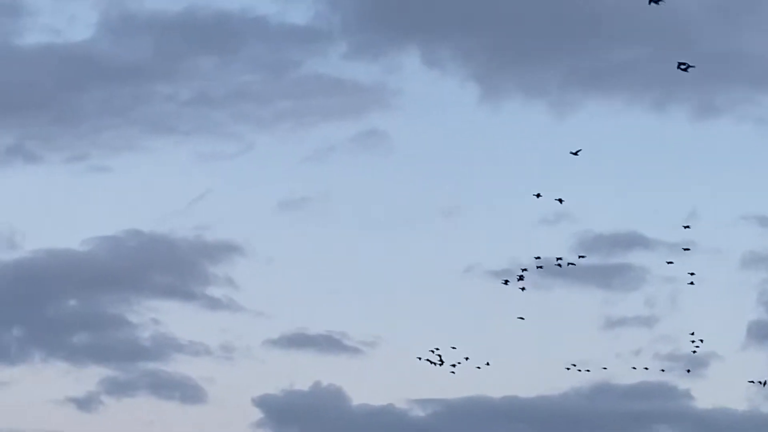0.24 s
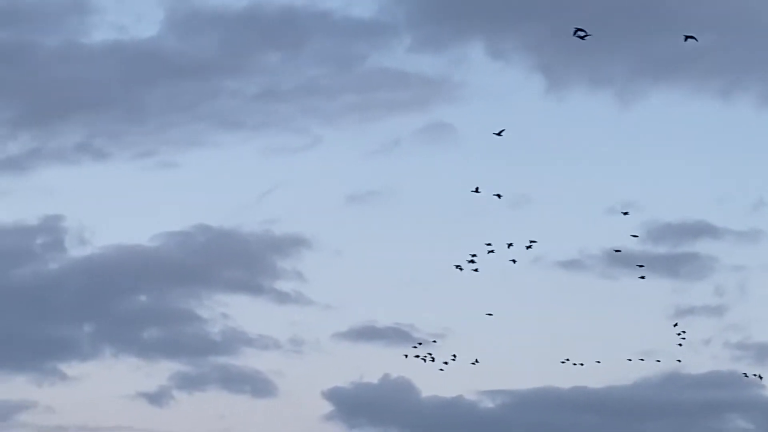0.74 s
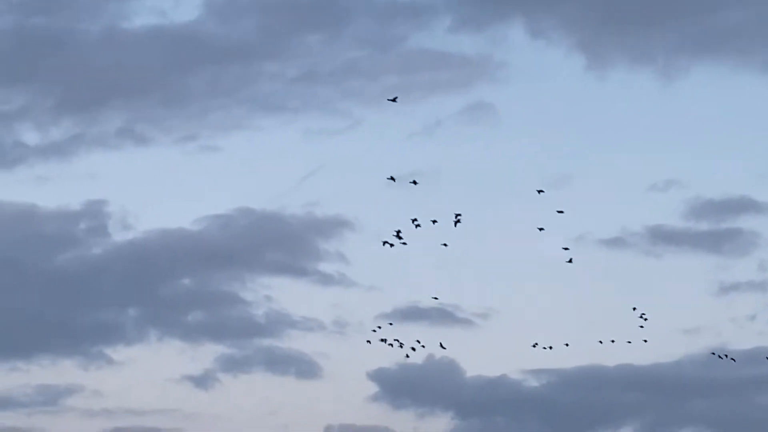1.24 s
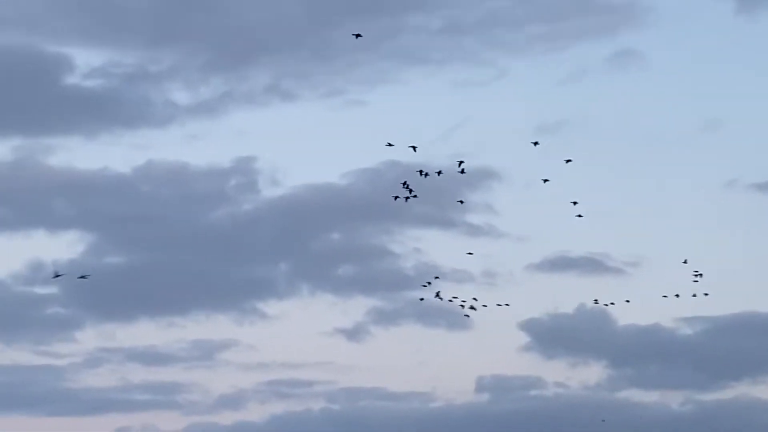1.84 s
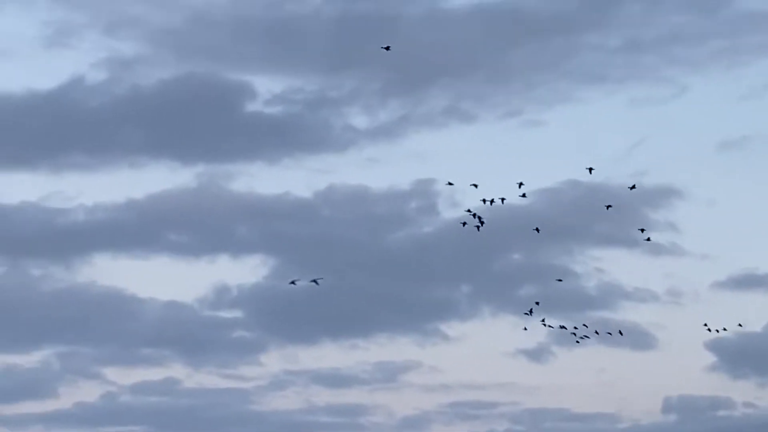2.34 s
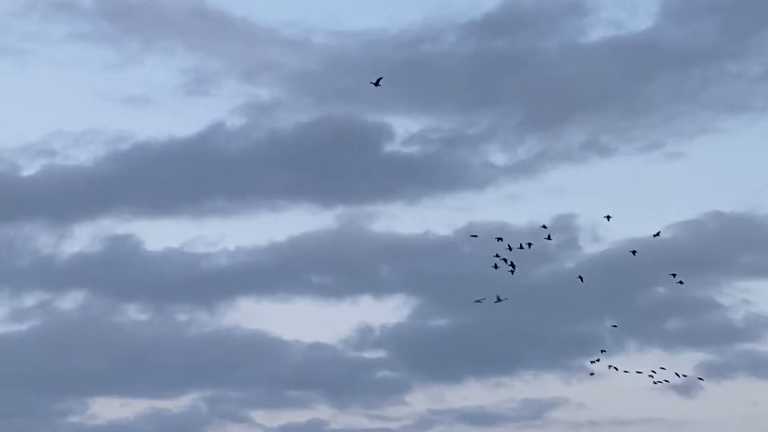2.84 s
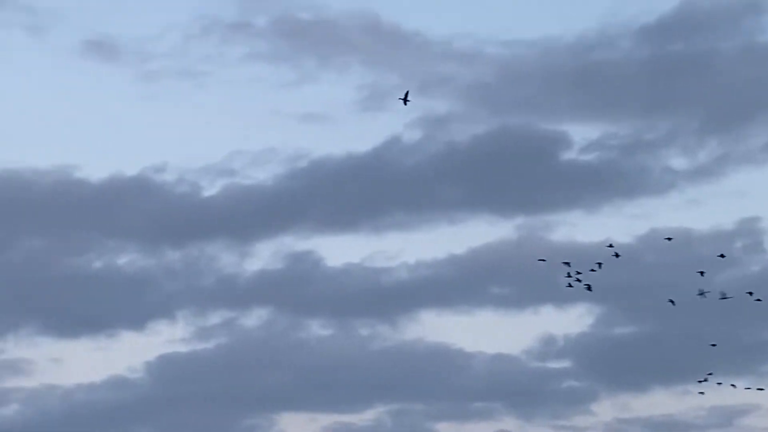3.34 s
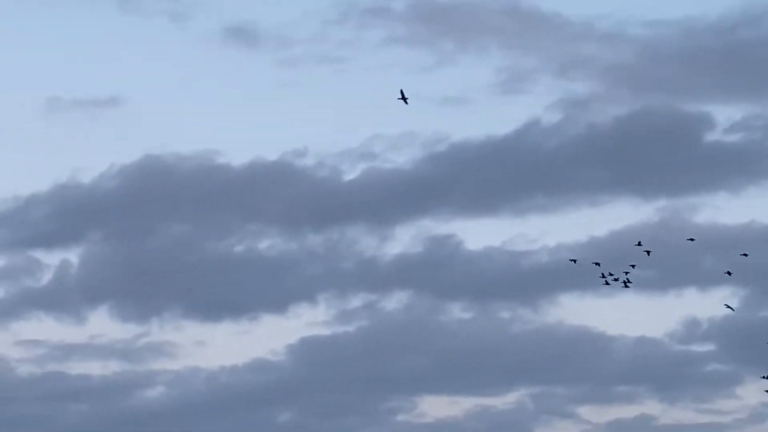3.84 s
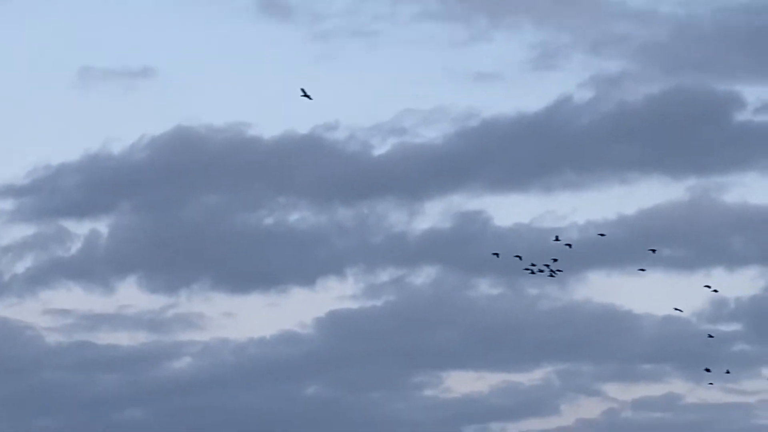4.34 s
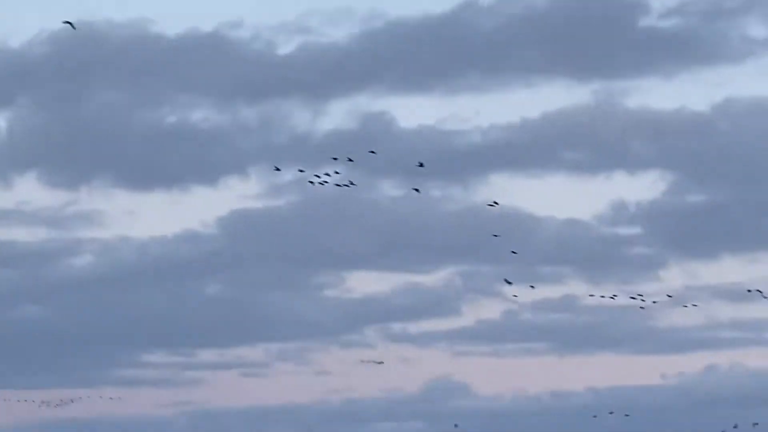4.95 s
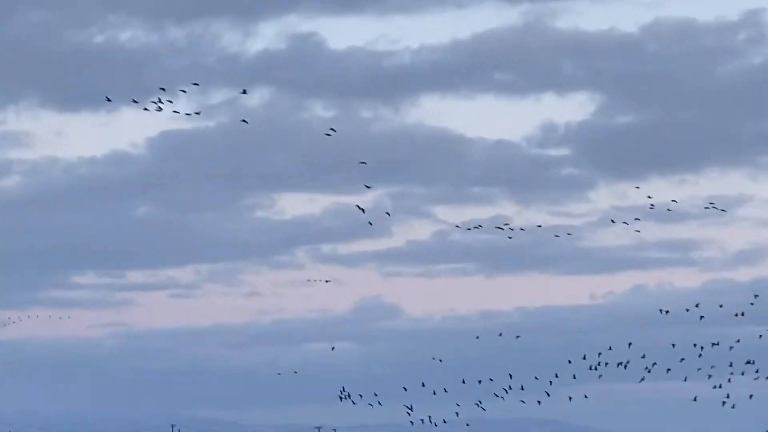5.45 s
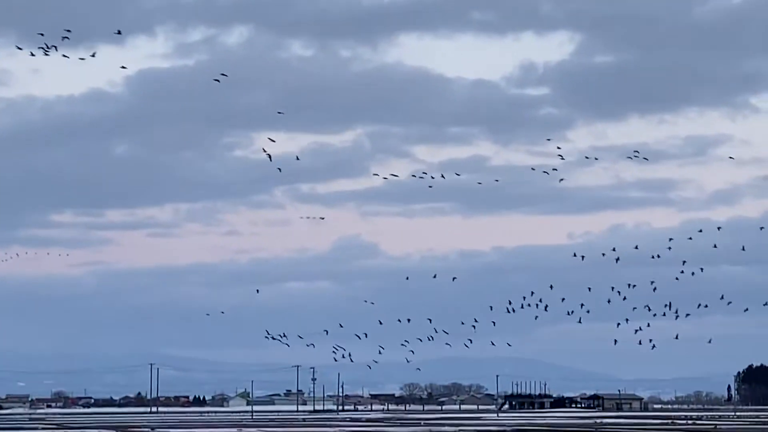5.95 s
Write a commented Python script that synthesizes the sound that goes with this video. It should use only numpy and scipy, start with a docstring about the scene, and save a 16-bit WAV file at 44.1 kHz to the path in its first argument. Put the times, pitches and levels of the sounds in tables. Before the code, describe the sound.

Outdoors on wide farmland, quick rounded goose yelps come densely, then more sparsely, then louder again. Behind them a skein chatters faintly and a far flock babbles, rising strongly at the end. Wind buffets the stereo microphone in soft bassy bumps, strongest near five seconds, as a passing car's broad rush swells. A few tiny handling ticks sit in the soft open-air background.

```python
"""Open fields: the nearest geese give short, high, arching yelps, their skein answers and a far flock babbles.
Each call is a bent tone with overtones; the open land adds a thin, dull tail.
Wind rumbles and thumps on the microphone, made of low noise; a soft murmur of shaped noise lies below.
Late on, a broad rush of noise, like the tyres of a passing car, swells and fades.
There are a few faint handling ticks, made of tiny dying bursts of noise."""
import sys
import numpy as np
from scipy import signal
from scipy.fft import rfft, irfft, next_fast_len
from scipy.io import wavfile
from scipy.ndimage import uniform_filter1d, map_coordinates

SR = 44100
rng = np.random.default_rng(int(sys.argv[2]) if len(sys.argv) > 2 else 0)


def unload_wav(signal):
    """Save mono or channel-first audio to the path in sys.argv[1] as 16-bit WAV at rate SR, clipped to [-1, 1]."""
    wavfile.write(
        sys.argv[1],
        SR,
        np.round(np.clip(np.atleast_2d(signal).T, -1, 1) * 32767).astype(np.int16),
    )


N = 273861

# calls of the nearest geese: (start [s], length [s], pitch near the crest [Hz],
# fundamental [dB], octave [dB], higher overtones [dB])
NEAR_CALLS = [(-0.038, 0.074, 1485, -48, -49.5, -51), (0.018, 0.072, 1483, -53.5, -57.5, -55.5),
              (0.081, 0.076, 1444, -47, -58, -63), (0.122, 0.059, 1475, -46, -53, -51.5),
              (0.203, 0.088, 1462, -47.5, -61, -67), (0.336, 0.045, 1434, -63, -64, -68),
              (0.41, 0.092, 1414, -63, -59.5, -68), (0.55, 0.061, 1404, -58, -69, -76),
              (0.608, 0.065, 1487, -52.5, -68, -68), (0.746, 0.044, 1436, -55, -65.0, -72),
              (0.819, 0.12, 1534, -48, -54, -59.5), (1.063, 0.088, 1700, -49, -80, -84),
              (1.087, 0.12, 1506, -47, -58, -61.5), (1.266, 0.05, 1598, -52, -63, -67.5),
              (1.299, 0.062, 1475, -50.5, -67, -67), (1.411, 0.08, 1474, -46, -67, -64.5),
              (1.535, 0.075, 1420, -53, -74, -75.5), (1.585, 0.11, 1650, -53, -77, -86),
              (1.712, 0.1, 1517, -55, -55, -64), (1.834, 0.085, 1445, -56, -60.5, -68),
              (2.145, 0.062, 1433, -54, -54, -66), (2.208, 0.059, 1021, -53.0, -72.0, -71),
              (2.365, 0.095, 1484, -55, -59, -70), (2.47, 0.082, 1500, -58, -55.5, -65.0),
              (2.758, 0.094, 1710, -50, -75, -80), (3.177, 0.054, 1490, -51.5, -61, -65),
              (3.276, 0.081, 1510, -51.5, -74, -69), (3.342, 0.095, 1348, -48, -57, -57.0),
              (3.374, 0.059, 1483, -46, -55.5, -59.5), (3.502, 0.079, 1330, -50.5, -64, -65),
              (4.103, 0.074, 1500, -50.5, -63, -69), (4.464, 0.062, 1448, -46, -59.5, -77),
              (4.589, 0.04, 1490, -40, -49, -46), (4.61, 0.054, 1680, -42, -51, -55),
              (4.641, 0.066, 1553, -53, -62, -56.5), (4.673, 0.053, 1326, -51, -52.5, -57),
              (4.798, 0.056, 1437, -43, -53, -49.5), (5.116, 0.039, 996, -44.5, -41, -55),
              (5.125, 0.08, 1275, -43, -47.5, -53), (5.275, 0.049, 1277, -42.5, -48, -53.5),
              (5.471, 0.085, 1488, -44.5, -56, -71), (5.759, 0.075, 1523, -45.5, -60.5, -59.0),
              (5.924, 0.048, 1582, -45, -67.5, -74.0), (6.165, 0.07, 1478, -47.5, -61, -74)]
# a goose's throat: its higher overtones are level up to the first frequency [Hz],
# weaken by the second and die away by the third
THROAT_HZ = [4890, 5650, 7400]
# the rest of the near skein: (time [s], level [dB])
SKEIN_LEVEL = [(0, -59.5), (1.5, -56.5), (3, -56.5), (4.5, -58), (5.7, -51.5), (6.2, -55)]
# voice of the skein: (pitch [Hz], pitch spread [natural log], octave [dB], higher overtones [dB]),
# overtones compared with the fundamental
SKEIN_VOICE = (1440, 0.07, -13, -23.5)
# the big far flock: (time [s], level [dB])
FLOCK_LEVEL = [(0, -62), (3, -61), (4.8, -59), (5.7, -47), (6.2, -49)]
# voice of the far flock, lower, more varied and dulled by the air: same columns as the skein's voice
FLOCK_VOICE = (1090, .19, -22, -33)
# wind rumble between the eddies, before the overall lift: (time [s], level [dB])
RUMBLE_LEVEL = [(0.0, -69), (0.6, -55), (1.28, -43), (3.08, -46.5), (3.53, -37), (3.79, -57), (4.01, -51.5),
                (4.17, -42.5), (5.14, -35.5), (5.62, -39), (6.1, -36.5)]
# colour of the wind rumble: (frequency [Hz], relative level [dB])
RUMBLE_COLOUR = [(20, -28.5), (40, -12.5), (62, 1), (84, 1), (140, -5.5), (250, -13), (400, -20),
                 (1200, -100.5)]
# eddies that hit the microphone: (middle [s], strength [dB], length [s])
EDDIES = [(1.095, -38.5, .17), (1.328, -31.5, 0.066), (1.405, -32.5, 0.026), (1.712, -26, .075),
          (2.058, -28.5, .1), (2.445, -34, .1), (2.699, -36, 0.17), (2.873, -37, 0.027),
          (3.263, -33.5, 0.061), (3.431, -30, 0.081), (3.511, -31.5, 0.033), (3.539, -24.5, 0.029),
          (3.588, -28.5, .045), (4.069, -35.5, 0.067), (4.623, -27, .05), (4.753, -29.5, .03),
          (4.833, -27, .04), (4.983, -19, 0.056), (5.142, -23, 0.063), (5.183, -21, 0.023),
          (5.819, -35, 0.08)]
# how the wind splits between the two microphone ports:
# (time [s], unshared part [dB], lift on the left and equal cut on the right [dB])
PORTS = [(3.9, -13.5, 0.1), (4.98, -0.5, 0.4), (5.3, -6.5, 0.7), (5.8, -1, 3)]
# swell and fade of the tyre roar:
# (peak time [s], peak level [dB], approach [s], retreat [s], loss per tenfold distance [dB])
ROAR_PASS = (5, -36, 1.5, 1.13, 75.5)
# swell and fade of the tread spray: same columns as the roar
HISS_PASS = (5.5, -48.5, 1.12, 0.36, 34.5)
# colour of the tyre roar: (frequency [Hz], relative level [dB])
ROAR_COLOUR = [(100, -17), (280, -0.5), (390, -2.5), (490, -3.5), (830, -3), (1230, -8.5), (1950, -13.5),
               (2800, -29), (6000, -59.5)]
# colour of the tread spray: (frequency [Hz], relative level [dB])
HISS_COLOUR = [(1200, -19), (2600, 1.5), (4500, -6), (6800, -12), (14500, -27)]
# how the road reaches the two channels:
# (frequency [Hz], likeness [0-1], left leads by [radians], left minus right [dB])
ROAD_IMAGE = [(200, 0.1, -0.5, -1.5), (650, 0.97, -2.5, 2), (1125, 0.95, -3, 3.5), (1640, 1, -6, 9.5),
              (2960, 1, -6, 1.5), (5940, 0.89, -7, 0), (10650, 1, -1.5, 0)]
# handling ticks: (time [s], strength before shaping [dB])
TICKS = [(1.232, -64.5), (5.2, -51.5), (5.424, -48.5)]
# colour of the distant land: (frequency [Hz], relative level [dB])
MURMUR_COLOUR = [(25, -5), (65, 1), (110, -11.5), (430, -14), (560, -6.5), (1500, -14), (2160, -18),
                 (5400, -36.5), (8000, -75.5)]
# how the open land reaches the two channels: same columns as the road
FIELD_IMAGE = [(150, 0.8, -0.51, -2), (320, 0.6, -2, -4), (670, 0.83, -1.17, -6), (1270, 0.7, -1.5, 1.5),
               (2410, .995, -0.9, -1.5)]

# longer calls bend further; the pitch crests after a quick rise plus a share of the call
ARCH_PER_S, RISE_S, RISE_SHARE = 4.3, 0.01705, 0.1896
# top overtones are weaker, the more so in longer calls
SHORT_CALL_S, TOP_LOSS_DB_PER_S, TOP_LOSS_DB = 0.058, 346.5, 8.5
RUMBLE_LIFT_DB = 3
# a typical eddy: its strength and the top of its thump
EDDY_DB, EDDY_EDGE_HZ = -28.5, 203.5
# stronger eddies reach higher; pressure grows with the square of the speed
EDDY_BRIGHTENS, EDDY_SKEW = 0.5, 0.07
FAR_ROAD_DB = -53.5  # roar that remains while the car is far off
LOW_CUT_HZ, TOP_HZ = 26, 14500  # bass roll-off and upper limit of the microphone


def amp(db):
    """Turn decibels into gain."""
    return 10 ** (np.asarray(db) / 20)


def unit(x):
    """Scale a sound to an rms level of 1."""
    return x / np.sqrt(np.mean(x ** 2) + 1e-20)


def along(points, hz):
    """Read levels from a table of frequencies, on a log scale as hearing works."""
    knots_hz, level = np.transpose(points)
    return np.interp(np.log(hz + 1), np.log(knots_hz + 1), level)


def curves(rows):
    """Join the table's moments into one smooth-running value per sample for each later column."""
    s, *cols = np.transpose(rows)
    return [np.interp(np.arange(N) / SR, s, c) for c in cols]


def wobble(rate, size=N):
    """Draw a smooth random curve through `rate` random points a second."""
    points = rng.standard_normal(int(size * rate / SR) + 4)
    return map_coordinates(points, [np.arange(size) * rate / SR])


def filtered(x, response):
    """Scale each frequency of a sound by response(hz)."""
    n = x.shape[-1]
    m = next_fast_len(n + 8192)
    hz = np.fft.rfftfreq(m, 1 / SR)
    return irfft(rfft(x, m) * response(hz), m)[..., :n]


def add(track, sound, s):
    """Mix a sound into a track from time s on, cut at the track's ends."""
    start = round(s * SR)
    lo, hi = max(start, 0), min(start + sound.shape[-1], N)
    if hi > lo:
        track[..., lo:hi] += sound[..., lo - start:hi - start]


def rush(colour, image, patchy_db):
    """Coloured stereo noise with soft patches, and a likeness, phase and balance for each frequency."""
    z = signal.stft(rng.standard_normal((2, N)), nperseg=512)[2]
    # smooth a random field over frequency, then over time
    patches = uniform_filter1d(rng.standard_normal(z.shape[1:]), size=4, axis=0)
    patches = unit(uniform_filter1d(patches, size=12, axis=1))
    pair = signal.istft(z * amp(patchy_db * patches), nperseg=512)[1][:, :N]

    size = next_fast_len(N + 8192)
    hz = np.fft.rfftfreq(size, 1 / SR)
    a, b = rfft(pair, size) * amp(along(colour, hz))
    knots, *cols = np.transpose(image)
    alike, lead, tilt_db = [np.interp(np.log(hz + 1), np.log(knots), c) for c in cols]
    # left and right share noise a and take opposite amounts of noise b
    sides = np.array([[1], [-1]])
    turn = np.arccos(np.clip(alike, 0, 1)) / 2
    both = np.cos(turn) * a + sides * np.sin(turn) * b
    both = both * np.exp(0.5j * sides * lead) * amp(sides * tilt_db / 2)
    return unit(irfft(both, size)[:, :N])


def yelp(pitch_hz, length, levels_db, jitter, rasp):
    """One call: the pitch arches and falls, overtones bloom mid-call, and the ragged onset rasps."""
    size = max(int(length * SR), 64)
    u = np.linspace(0, 1, size)  # progress through the call
    crest = RISE_S / length + RISE_SHARE
    arch = 1 - ARCH_PER_S * length * (u - crest) ** 2
    pitch = pitch_hz * arch * (1 + jitter * wobble(293.5, size=size))
    phase = 2 * np.pi * np.cumsum(pitch) / SR
    effort = np.abs(np.sin(np.pi * u ** 0.86)) ** 0.54

    root_db, octave_db, high_db = levels_db
    top_db = high_db - TOP_LOSS_DB - TOP_LOSS_DB_PER_S * max(length - SHORT_CALL_S, 0)
    k = np.arange(2, 6)[:, None]  # overtone numbers; 2 is the octave
    upper_db = np.interp(k * pitch_hz, THROAT_HZ, [high_db, top_db, top_db - 19.5])
    upper_db = np.where(k == 2, octave_db, upper_db)
    # turbulent air makes each overtone fade and swell on its own
    twinkle_db = 2.7 * np.array([wobble(67, size=size) for _ in k])
    upper = np.sum(amp(upper_db + twinkle_db) * np.sin(k * phase), axis=0)

    voice = amp(root_db) * effort * np.sin(phase) + effort ** 1.38 * upper
    roughness = 1 + rasp * (1 - u) ** 4 * wobble(1401.5, size=size)
    return np.sqrt(2) * voice * roughness


def near_geese():
    """The calls that stand out, each with its own pitch and mix of overtones from the throat."""
    out = np.zeros((2, N))
    for s, length, hz, *levels_db in NEAR_CALLS:
        add(out, yelp(hz, length, levels_db, jitter=0.0062, rasp=1.32), s)
    return out


def chorus(level, voice, jitter, count):
    """Many birds overlap, each call at its own pitch, strength and bearing."""
    out = np.zeros((2, N))
    pitch_hz, spread, *overtones_db = voice
    draws = rng.standard_normal((count, 5))
    for turn, (late, pitch, span, loud, bearing) in enumerate(draws):
        hz = pitch_hz * np.exp(spread * pitch)
        length = 0.058 * np.exp(0.2 * span)
        call = yelp(hz, length, (0, *overtones_db), jitter, rasp=1)
        bearing_db = 1 + 1.8 * bearing  # positive is towards the left
        pair = amp(1.3 * loud) * amp([[bearing_db], [-bearing_db]]) * call
        add(out, pair, (turn + late) / count * (N / SR + 0.1) - 0.1)
    return amp(curves(level)[0]) * unit(out)


def fields(x, t60):
    """Ground and far hedges scatter a thin, dull tail that dies by 60 dB in t60 seconds."""
    t = np.arange(SR // 2) / SR
    fading = rng.standard_normal((2, len(t))) * amp(-60 * t / t60)
    mid, side = filtered(fading, lambda hz: 1 / (1 + (hz / 3200) ** 4))
    tail = unit(np.array([mid + side, mid - side])) / np.sqrt(len(t))
    return signal.fftconvolve(x, tail, axes=1)[:, :N]


def eddy(strength_db, length):
    """A puff of low noise; the harder it hits, the higher its thump reaches."""
    edge_hz = EDDY_EDGE_HZ * amp(EDDY_BRIGHTENS * (strength_db - EDDY_DB))
    noise = rng.standard_normal((2, int(length * SR)))
    flow = unit(filtered(noise, lambda hz: 1 / np.sqrt(1 + (hz / edge_hz) ** 6)))
    push = (flow + EDDY_SKEW * flow ** 2) * np.hanning(flow.shape[1])
    puff = filtered(push, lambda hz: hz ** 2 / (hz ** 2 + 48 ** 2))  # drop the slowest sway
    return amp(strength_db - 5.0) * np.array([unit(p) for p in puff])


def wind():
    """Moving air presses on the microphone: a lumpy rumble with thumping eddies."""
    apart = [(60, 0, 0.0098, 0.0047)]  # columns as the road image; the two sides are unlike
    lumps = unit(rush(RUMBLE_COLOUR, apart, patchy_db=1.6) * amp(2.17 * wobble(18)))
    out = amp(curves(RUMBLE_LEVEL)[0] + RUMBLE_LIFT_DB) * lumps
    for s, strength_db, length in EDDIES:
        add(out, eddy(strength_db, length), s - length / 2)
    # as the wind turns across the microphone, its two ports stop sharing
    # their eddies and the left one takes more
    apart_db, left_db = curves(PORTS)
    side = amp(apart_db) * out[1]
    return np.array([amp(left_db) * (out[0] + side), amp(-left_db) * (out[0] - side)])


def pass_by(peak_s, peak_db, approach_s, retreat_s, loss_db):
    """Gain of a source that nears and leaves: it falls with distance, the closest point being 1."""
    t = np.arange(N) / SR - peak_s
    distance = np.hypot(1, t / np.where(t < 0, approach_s, retreat_s))
    return amp(peak_db - loss_db * np.log10(distance))


def car():
    """Tyre roar nears and passes over a faint far roar; the hiss of tread spray peaks a little later."""
    roar_gain = np.hypot(pass_by(*ROAR_PASS), amp(FAR_ROAD_DB))
    roar = roar_gain * rush(ROAR_COLOUR, ROAD_IMAGE, patchy_db=1.5)
    hiss = pass_by(*HISS_PASS) * rush(HISS_COLOUR, ROAD_IMAGE, patchy_db=1.13)
    return roar + hiss


def ticks():
    """Small dry handling ticks: quickly dying noise, strongest near 2400 Hz."""
    out, t = np.zeros(N), np.arange(SR // 10) / SR
    for s, strength_db in TICKS:
        fade = amp(strength_db + 6.5 - 60 * t / 0.094)
        add(out, fade * rng.standard_normal(len(t)), s - 0.004)
    # (frequency [Hz], level [dB])
    colour = [(800, -1), (2400, 18.5), (4500, 2), (9000, -14), (14000, -24)]
    return filtered(out, lambda hz: amp(along(colour, hz)))


def murmur():
    """Distant roads and open land blend into a nearly steady, low noise."""
    level_db = -50.0 + 0.36 * wobble(2.2)
    return amp(level_db) * rush(MURMUR_COLOUR, FIELD_IMAGE, patchy_db=1.5)


def scene():
    """Geese above the fields, with wind and the road."""
    geese = near_geese()
    skein = chorus(SKEIN_LEVEL, SKEIN_VOICE, jitter=0.0074, count=150)
    far_flock = chorus(FLOCK_LEVEL, FLOCK_VOICE, jitter=0.013, count=450)
    flock = skein + far_flock
    tail = fields(amp(-23.0) * geese + amp(-8) * flock, t60=0.32)
    return geese + flock + tail + wind() + car() + ticks() + murmur()


def record(dry):
    """The microphone rolls off the deepest bass and keeps nothing above its upper limit."""
    return filtered(dry, lambda hz: (hz < TOP_HZ) / np.hypot(1, (LOW_CUT_HZ / (hz + 1)) ** 2))


dry = scene()
out = record(dry)
unload_wav(out)
```